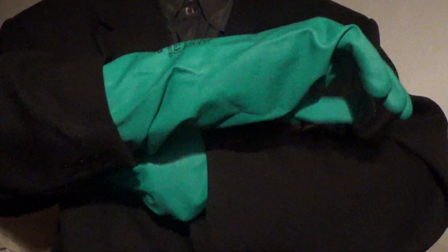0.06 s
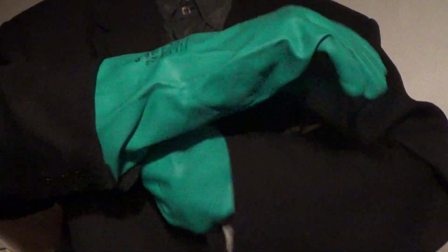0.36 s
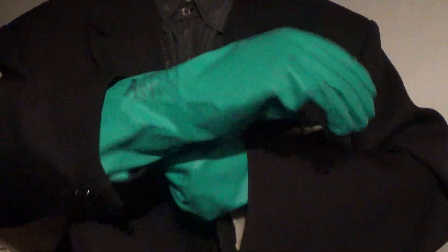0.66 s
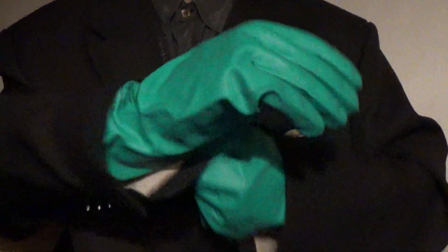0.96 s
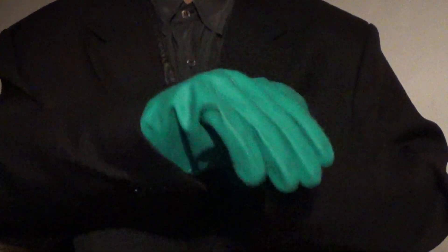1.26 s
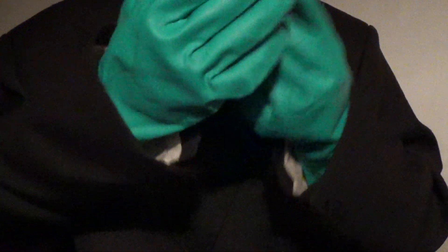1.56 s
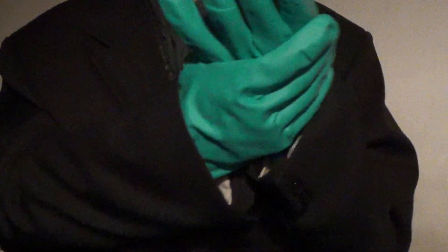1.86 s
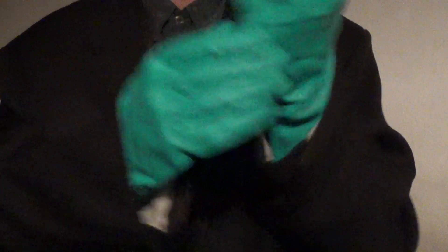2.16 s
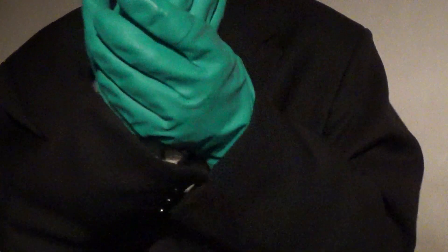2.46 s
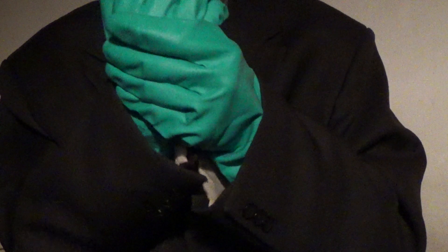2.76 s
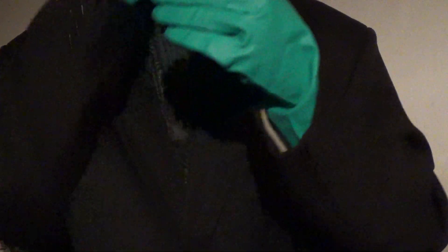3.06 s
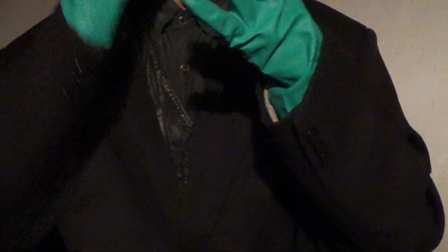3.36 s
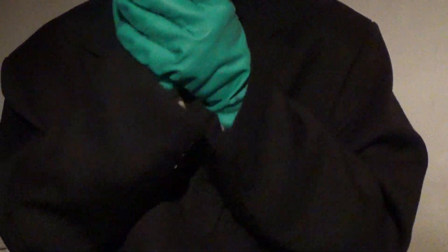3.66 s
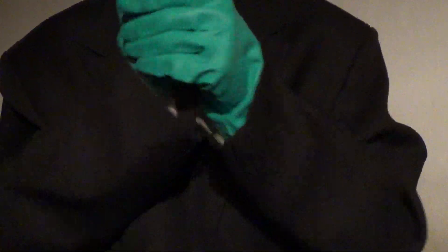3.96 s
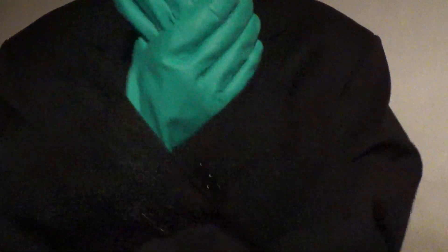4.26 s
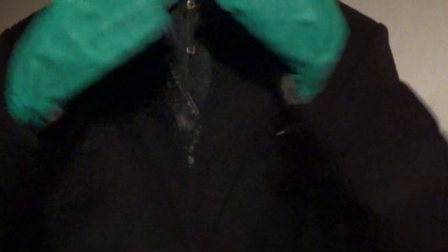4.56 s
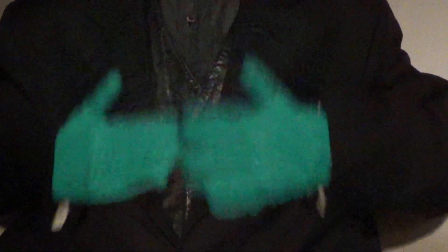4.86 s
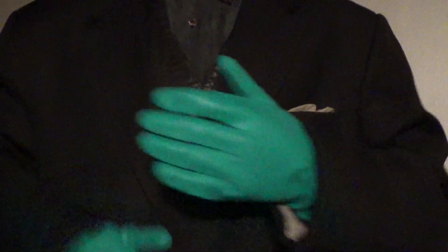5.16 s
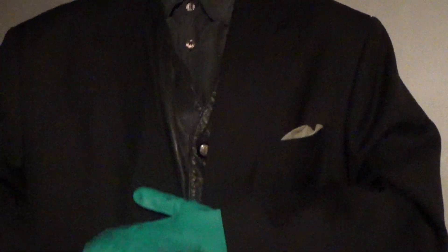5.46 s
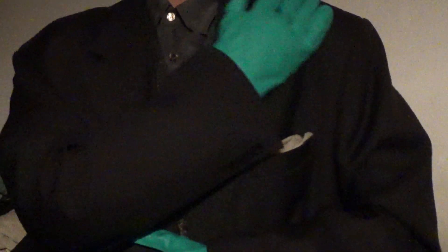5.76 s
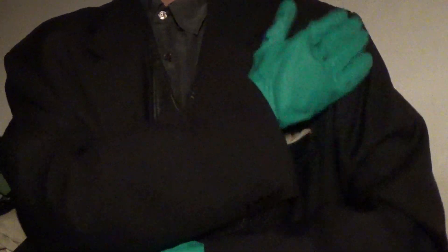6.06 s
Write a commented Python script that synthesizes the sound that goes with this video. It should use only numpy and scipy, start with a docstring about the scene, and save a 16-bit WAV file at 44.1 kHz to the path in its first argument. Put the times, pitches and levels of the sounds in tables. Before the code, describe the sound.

Gloved hands work against each other with hissing rubbery strokes, crinkly snaps and a few smacks, ending in soft pats on cloth.

```python
"""A small quiet room, close to a stereo microphone: someone in a suit works on a pair of rubber gloves.
Rubber slides on cloth and on rubber in hissing strokes, each a dense run of tiny slips. Creases buckle
with a pop, and under three squeezes the rubber sticks and slips in rows of ticks. The gloved palms slap
together three times, the air between them ringing briefly, then pat and brush the jacket."""
import sys
import numpy as np
from scipy import signal
from scipy.fft import rfft, irfft
from scipy.io import wavfile

SR = 44100
rng = np.random.default_rng(int(sys.argv[2]) if len(sys.argv) > 2 else 0)


def bounce(signal):
    """Save signal as a 16-bit WAV file at the path given by the first command-line argument."""
    frames = np.transpose(np.atleast_2d(signal))
    limited = np.clip(frames, -1, 1)
    pcm = np.round(limited * 32767).astype(np.int16)
    wavfile.write(sys.argv[1], SR, pcm)


N = 269010
T = np.arange(N) / SR


def amp(db):
    """Decibels to gain."""
    return 10 ** (np.asarray(db) / 20)


def gains(outline, size):
    """A (frequency [Hz], level [dB]) outline as a gain for each bin of a transform."""
    hz, db = np.transpose(outline)
    bin_hz = np.arange(size // 2 + 1) * SR / size
    return amp(np.interp(np.log(bin_hz + 1), np.log(hz), db))


def response(outline, size=2048):
    """Minimum-phase impulse response with the given outline."""
    cepstrum = irfft(np.log(gains(outline, size)))
    cepstrum[1:size // 2] *= 2
    cepstrum[size // 2 + 1:] = 0
    return irfft(np.exp(rfft(cepstrum)))


def colour(x, outline):
    """Shape a white sound and keep its power."""
    impulse = response(outline)
    return signal.fftconvolve(x, impulse / np.linalg.norm(impulse))[:len(x)]


def ring(x, hz, q):
    """One damped resonance that keeps the power of a white sound."""
    hz = min(hz, SR / 3)
    return signal.lfilter(*signal.iirpeak(hz, max(q, 1), fs=SR), x) * np.sqrt(q * SR / (np.pi * hz))


def wander(rate):
    """Random drift with a spread near 1, turning rate times a second."""
    knots = rng.standard_normal(N // 20)
    return np.interp(T * rate, np.arange(len(knots)), knots)


def slips(size, rate, spread_db):
    """Tiny releases of a stuck surface, random in time and strength, about rate a second; rms 1."""
    releases = (rng.random(size) < rate / SR) * rng.standard_normal(size)
    releases *= amp(spread_db * np.minimum(rng.exponential(size=size), 4))
    return releases / (releases.std() + 1e-12)


def add(out, x, start_s):
    """Mix a short sound in at a given time."""
    i = int(start_s * SR)
    out[i:i + len(x)] += x[:N - i]


# Width of the room at the microphone: (frequency [Hz], side minus mid [dB])
ROOM_WIDTH = [(40, -26), (130, -6.5), (600, -1.5), (2000, -3), (6000, -6.5), (12000, -5.5)]
def stereo(mid, side):
    """Left and right from a common and an unrelated sound."""
    side = signal.fftconvolve(side, response(ROOM_WIDTH))[:N]
    return np.array([mid + side, mid - side])


# The still room, all around the microphone: (frequency [Hz], level [dB])
ROOM_TONE_SPECTRUM = [(15, -73), (25, -12), (152, -5), (215, -7), (457, -6.5), (598, -10), (895, -8),
                      (1050, -11), (15500, -24)]
def room_tone():
    """Faint steady air and hiss."""
    mid, side = (colour(rng.standard_normal(N), ROOM_TONE_SPECTRUM) for _ in range(2))
    return amp(-59) * stereo(mid, side)


# Glove on the jacket, close up: (fastest moment [s], rise [s], fall [s], level [dB], relative hiss [dB])
JACKET_BRUSHES = [(.05, 0.082, 0.07, -69, -14), (.42, .15, 0.063, -61.5, -1), (.66, 0.061, 0.36, -62.5, -6),
                  (1.031, 0.14, .1, -55.5, -3.5), (1.14, 0.021, 0.079, -52.5, -0.5),
                  (1.25, 0.086, 0.063, -50.5, -1.5), (1.47, 0.089, 0.051, -57, -5),
                  (4.79, 0.18, 0.053, -55.5, -14), (4.902, 0.11, .13, -36, -3.5),
                  (5.07, .06, 0.072, -69, 7), (5.31, 0.12, .13, -47.5, -2), (5.44, 0.059, 0.046, -51.5, 0),
                  (5.65, 0.13, 0.37, -54.5, -6), (5.89, 0.073, 0.092, -42.5, -23),
                  (6.045, 0.065, 0.071, -49.5, -12)]
DULL_RING_DB = -9.5  # weak ring of the rubbed patch, relative to plain friction
def brushes():
    """Moves of rubber over cloth, for strokes(): a harder brush rings higher."""
    middling_hz, middling_db, db_per_octave = 1900, -44, 15.5
    for time, rise, fall, db, hiss_db in JACKET_BRUSHES:
        patch_hz = middling_hz * 2 ** ((db - middling_db) / db_per_octave)
        yield time, rise, fall, db, hiss_db, patch_hz, DULL_RING_DB


# Rubber friction, its fine hiss and the suit sleeves at close range: (frequency [Hz], level [dB])
FRICTION_SPECTRUM = [(150, -19.5), (650, -10.5), (1100, 0.5), (2000, 1.5), (3900, 1.5), (6000, 0.5),
                     (8000, -5), (11000, -11), (16000, -13)]
HISS_SPECTRUM = [(2000, -23), (5000, -8), (8000, 5.5), (10000, 8), (12500, 4), (16000, 1.5)]
SLEEVE_SPECTRUM = [(40, -9), (140, -2), (350, -2), (650, -6), (1000, -6), (1800, -4), (4000, -16),
                   (12000, -15)]
def strokes(moves):
    """Sliding rubber: dense slips swell and fade with the speed of the hand, and the sleeves move along."""
    rubber, effort = np.zeros(N), np.zeros(N)
    patch_slips = slips(N, rate=15000, spread_db=-1.8)
    friction = colour(slips(N, rate=16000, spread_db=-1.5), FRICTION_SPECTRUM)
    hiss = amp(-0.1) * colour(slips(N, rate=20000, spread_db=1.5), HISS_SPECTRUM)
    for fastest, rise, fall, db, hiss_db, patch_hz, ring_db in moves:
        start, end = fastest - rise, fastest + fall
        moving = (T > start) & (T < end)
        speed = np.sin(np.pi / 2 * np.interp(T[moving], [start, fastest, end], [0, 1, 0]))
        push = amp(db) * speed ** 1.15
        patch = amp(ring_db) * ring(patch_slips[moving], patch_hz, q=2.2)
        slide = (friction[moving] + patch) / np.hypot(1, amp(ring_db)) + amp(hiss_db) * hiss[moving]
        # taut rubber rings high and keeps its sheen; slack rubber on cloth is dull
        sheen_hz = min(9300 + 1.3 * patch_hz, .45 * SR)
        rubber[moving] += push * signal.lfilter(*signal.cheby1(3, 1, sheen_hz, fs=SR), slide)
        effort[moving] += push ** 2
    grip = amp(.5 * wander(rate=45) + 1.1 * wander(rate=400))
    # cloth rustles even in slow moves and swells less than the rubber
    rustle = colour(slips(N, rate=2500, spread_db=3.5), SLEEVE_SPECTRUM)
    sleeves = rustle * effort ** 0.25 * amp(-31.5 + wander(rate=28))
    return grip * rubber + sleeves


def contacts(rows, outline, rate, spread_db, q, size=8192):
    """Loose rubber lands patch by patch; the air caught underneath rings briefly."""
    out, lead = np.zeros(N), size // 4
    t = (np.arange(size) - lead) / SR
    for time, db, closing, hold, decay, air_hz, air_db in rows:
        envelope = np.exp(np.where(t < 0, t / closing, -np.maximum(t - hold, 0) / decay))
        patches = slips(size, rate, spread_db) * envelope
        blow = colour(patches, outline) + amp(air_db) * ring(patches, air_hz, q)
        # a small contact radiates little bass
        blow = signal.lfilter(*signal.butter(2, 0.18 * air_hz, "high", fs=SR), blow)
        add(out, amp(db) * blow, time - lead / SR)
    return out


# A hand on the other hand or the jacket, near the microphone:
# (time [s], level [dB], decay [s], trapped air [Hz], relative air level [dB])
SOFT_PATS = [(0.47, -63.5, 0.0037, 820, 12.5), (1.218, -58.5, 0.0059, 800, 10.5),
             (1.731, -53, 0.0054, 317, 8), (4.772, -38, 0.014, 770, -4), (4.886, -33.5, 0.002, 380, -4.5),
             (5.191, -38.5, 0.011, 433, -22), (5.216, -36, 0.0091, 173, -9), (5.33, -34.5, 0.014, 135, -7),
             (5.639, -56, 0.069, 310, -3)]
# The dull body of a soft contact: (frequency [Hz], level [dB])
PAT_SPECTRUM = [(25, -43), (60, 15.5), (160, 6), (520, 4.5), (900, -3.5), (1600, -2), (4000, -8),
                (10000, -9.5), (16000, -24)]
def pats():
    """Soft contacts that swell and die in about the same time; trapped air rings for a few cycles."""
    rows = [(time, db, 1.24 * decay, 0, decay, air_hz, air_db)
            for time, db, decay, air_hz, air_db in SOFT_PATS]
    return contacts(rows, PAT_SPECTRUM, rate=6000, spread_db=1.1, q=2.5)


# Glove on glove, close up: (fastest moment [s], rise [s], fall [s], level [dB], patch resonance [Hz])
GLOVE_RUBS = [(1.503, 0.021, .045, -50, 3600), (1.723, 0.019, 0.16, -37.5, 4320),
              (1.99, 0.062, 0.051, -47, 4730), (2.13, 0.11, 0.026, -48.5, 4320),
              (2.15, 0.04, 0.053, -45, 5800), (2.214, 0.025, 0.023, -46, 5370),
              (2.91, 0.11, 0.083, -52, 3670), (3.315, 0.029, 0.034, -57.5, 4400),
              (4.01, 0.17, 0.062, -50, 4340), (4.04, 0.019, 0.055, -46.5, 5240),
              (4.357, 0.084, 0.047, -44.5, 4840), (4.505, 0.12, .032, -47, 4730)]
def rubs():
    """Moves of rubber over rubber, for strokes(): the tauter it is, the higher and hissier it sounds."""
    taut_hz, taut_hiss_db, db_per_octave, ring_db = 4470, -5, 31.5, 0
    for time, rise, fall, db, patch_hz in GLOVE_RUBS:
        hiss_db = taut_hiss_db + db_per_octave * np.log2(patch_hz / taut_hz)
        yield time, rise, fall, db, hiss_db, patch_hz, ring_db


# Single creases popping over near the microphone, and at 3.524 s the fingertips touching just before the palms
# meet: (time [s], peak level [dB], ring [Hz])
CREASE_POPS = [(1.49, -35, 4740), (1.6955, -32, 4100), (1.879, -29, 4350), (2.0343, -28, 3770),
               (2.722, -21, 3580), (3.524, -20, 2770), (4.405, -28, 2190), (4.7446, -29.5, 1850),
               (4.762, -26, 1540), (5.004, -25.5, 9300)]
# The tick of a rubber fold: (frequency [Hz], level [dB])
CREASE_SPECTRUM = [(100, 2), (400, -1.5), (900, 2), (2000, -3.5), (5000, -6.5), (10000, -5), (16000, -23)]
def creases(squeeze_ticks, size=2048):
    """Each pop or squeeze tick snaps like a fold buckling, with small wrinkles giving way just before and
    after."""
    out, lead = np.zeros(N), size // 4
    t = (np.arange(size) - lead) / SR
    for time, db, hz in [*CREASE_POPS, *squeeze_ticks]:
        envelope = np.exp(np.where(t < 0, t / .0011, -t / .003))
        push = .15 * slips(size, rate=5000, spread_db=2) * envelope
        push[lead] += 1  # the fold itself
        tick = colour(push + .4 * ring(push, hz, q=3), CREASE_SPECTRUM)
        add(out, tick / np.abs(tick).max() * amp(db), time - lead / SR + 0.00066)
    return out


# Fingers squeezing, close up: (grip begins [s], first slip [s], last slip [s], grip ends [s],
# slips [count], last slip peak [dB], creak level [dB])
SQUEEZE_GRIPS = [(1.86, 1.908, 1.936, 1.96, 5, -29, -63), (2.45, 2.573, 2.698, 2.9, 5, -25, -57),
                 (3.58, 3.644, 3.866, 3.97, 12, -27.5, -57.5)]
def creaks():
    """Under a slow squeeze the rubber sticks and lets go in separate small rasps."""
    pressure = sum(amp(db) * np.sqrt(np.interp(T, [begin, last, end], [0, 1, 0]))
                   for begin, _, last, end, _, _, db in SQUEEZE_GRIPS)
    releases = np.abs(slips(N, rate=150, spread_db=1.2))
    rasp_envelope = signal.lfilter([1], [1, -.975], releases)
    crackle = rasp_envelope * rng.standard_normal(N)
    return pressure * colour(crackle / crackle.std(), CREASE_SPECTRUM)


def drags():
    """Dull rubbing under each squeeze, for strokes(); it is strongest at the last slip."""
    above_creak_db, hiss_db, patch_hz = 1, -14, 1100
    for begin, _, last, end, _, _, db in SQUEEZE_GRIPS:
        yield last, last - begin, end - last, db + above_creak_db, hiss_db, patch_hz, DULL_RING_DB


def squeeze_slips():
    """Nearly regular ticks, for creases(): slips grow and space out as the grip tightens."""
    growth_db, slowing, jitter_s = 5.5, .1, .0003
    rebound_s, rebound_db = .0028, -7  # the fold catches once more after each slip
    for _, first, last, _, count, db, _ in SQUEEZE_GRIPS:
        for grip in np.linspace(0, 1, count):
            late, scatter_db, pitch, rebound_late = rng.standard_normal(4)
            progress = grip - slowing * grip * (1 - grip)
            time = first + (last - first) * progress + jitter_s * late
            peak_db = db - growth_db * (1 - grip) ** 2 + scatter_db
            hz = 4300 * 2 ** (.3 * pitch)
            yield time, peak_db, hz
            yield time + rebound_s * 2 ** (rebound_late / 2), peak_db + rebound_db, hz


# Palms meeting in front of the microphone:
# (time [s], level [dB], closing [s], hold [s], hollow between palms [Hz], relative hollow level [dB])
PALM_SLAPS = [(2.399, -31, 0.004, 0.015, 1850, -2), (3.537, -35, 0.006, 0.0023, 1270, -2.5),
              (4.229, -22, 0.0028, .002, 1670, -8.5)]
# The smack of rubber on rubber: (frequency [Hz], level [dB])
SLAP_SPECTRUM = [(60, 13), (300, 2), (800, -3.5), (2000, -16), (4200, 1.5), (6500, -4.5), (10000, -4.5),
                 (15500, -10.5)]
def slaps():
    """Rubber smacks on rubber, and the hands inside follow with a thud."""
    smack_decay_s, thud_decay_s, thud_lag_s = 0.013, 0.021, 0.0083
    thud_db, thud_hz, thud_air_db = -20.5, 335, -7.5
    smacks, thuds = [], []
    for time, db, closing, hold, hollow_hz, hollow_db in PALM_SLAPS:
        smacks.append((time, db, closing, hold, smack_decay_s, hollow_hz, hollow_db))
        thuds.append((time + thud_lag_s, db + thud_db, closing, hold, thud_decay_s, thud_hz, thud_air_db))
    return (contacts(smacks, SLAP_SPECTRUM, rate=14000, spread_db=2.2, q=1.1)
            + contacts(thuds, PAT_SPECTRUM, rate=5000, spread_db=-1.5, q=2.5))


# What the walls send back to the microphone: (frequency [Hz], level [dB])
ECHO_SPECTRUM = [(50, -11), (200, -1.5), (700, 2), (2500, -6), (6000, -2.0), (14000, -10.5)]
def room_echo(direct, t60_s, wet_db, size=16384):
    """Short diffuse echo of a furnished room, duller than the direct sound."""
    t = np.arange(size) / SR
    decay = np.exp(-np.log(1000) * t / t60_s) * (t > .004)
    tails = [colour(rng.standard_normal(size), ECHO_SPECTRUM) * decay for _ in range(2)]
    mid, side = (signal.fftconvolve(direct, tail / np.linalg.norm(tail))[:N] for tail in tails)
    return amp(wet_db) * stereo(mid, side)


def scene():
    """Both hands work close to the microphone, a little left of centre, with the room faint behind."""
    sliding = strokes([*rubs(), *brushes(), *drags()])
    hands = sliding + creaks() + creases(squeeze_slips()) + slaps() + pats()
    pan = amp([[0.49], [-0.49]])
    return hands * pan + room_echo(hands, t60_s=.3, wet_db=-17.5) + room_tone()


# The microphone, with a dip and a peak in the high treble: (frequency [Hz], level [dB])
MICROPHONE_RESPONSE = [(20, -7.5), (6200, 0), (7000, -2.5), (8200, -2.5), (9300, 2), (10200, -1.5),
                       (16000, -7)]
def record(dry):
    """The microphone colours the sound and hears the high treble nearly in mono; the very top is cut."""
    left, right = signal.fftconvolve(dry, response(MICROPHONE_RESPONSE)[None], axes=1)[:, :N]
    mid = (left + right) / 2
    narrowing = gains([(9000, -2), (13000, -20)], N)
    side = irfft(rfft(left - right) * narrowing, N) / 2
    top_cut = signal.ellip(10, .2, 70, 15700, fs=SR, output="sos")
    return signal.sosfilt(top_cut, [mid + side, mid - side])


dry = scene()
out = record(dry)
bounce(out)
```